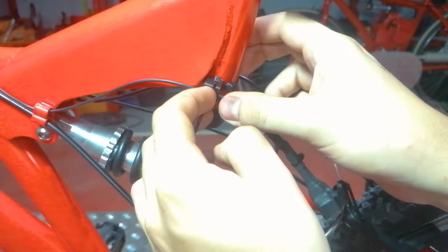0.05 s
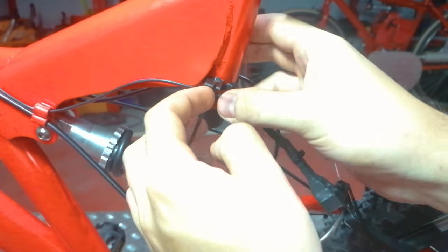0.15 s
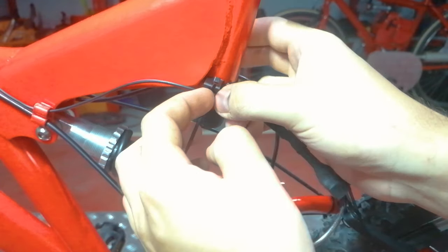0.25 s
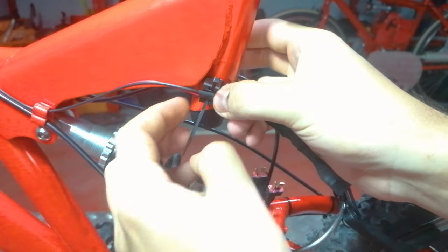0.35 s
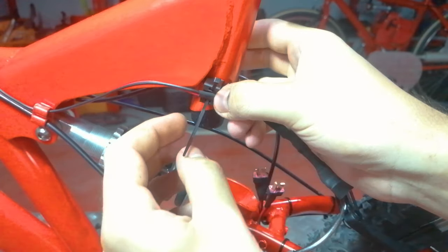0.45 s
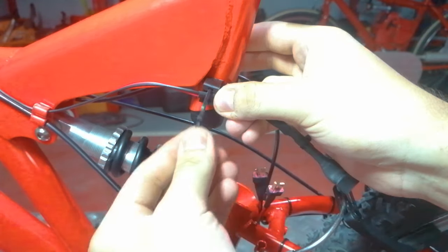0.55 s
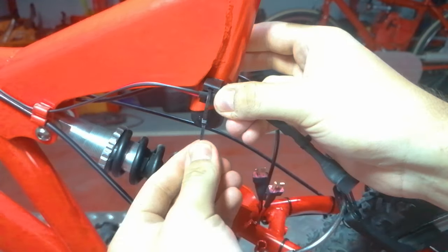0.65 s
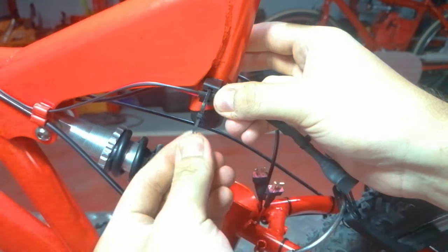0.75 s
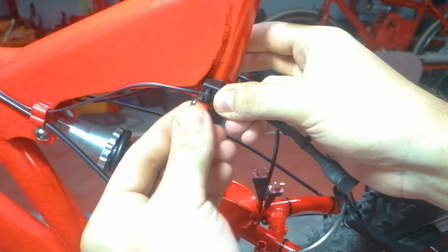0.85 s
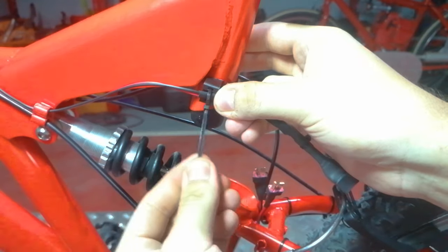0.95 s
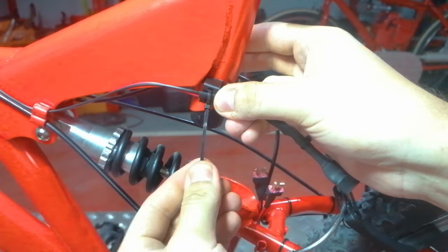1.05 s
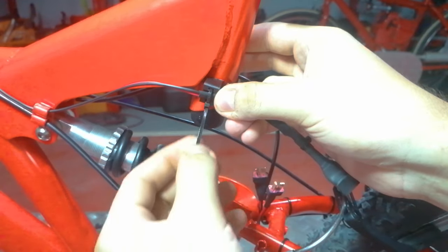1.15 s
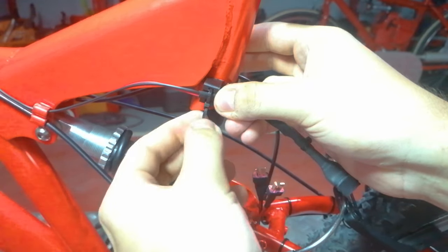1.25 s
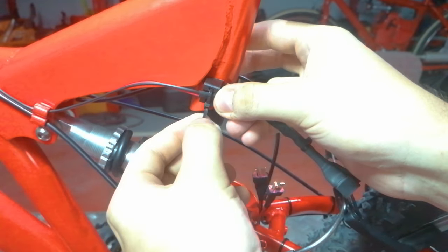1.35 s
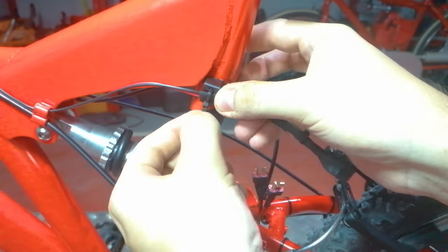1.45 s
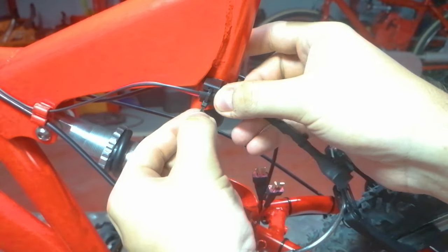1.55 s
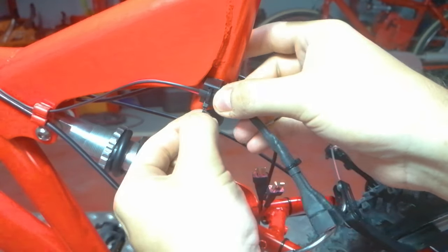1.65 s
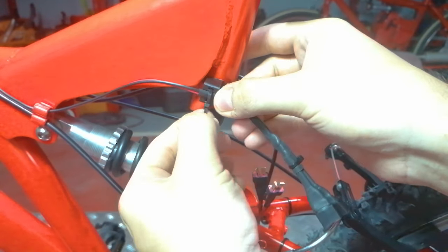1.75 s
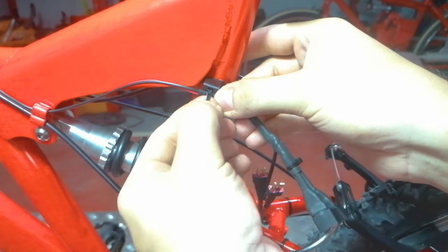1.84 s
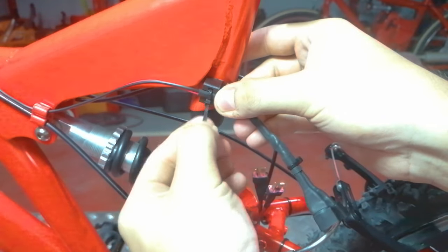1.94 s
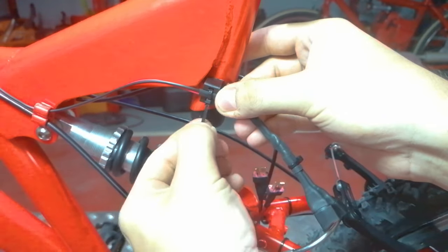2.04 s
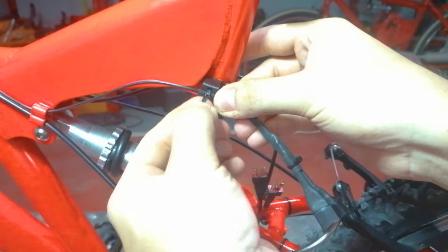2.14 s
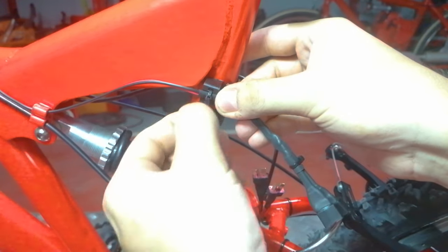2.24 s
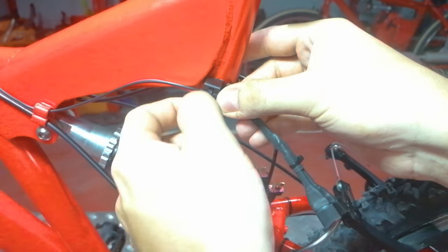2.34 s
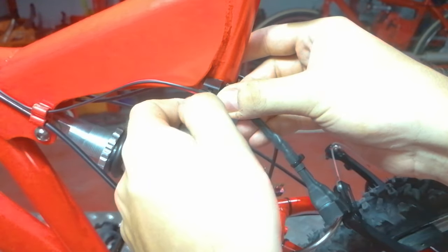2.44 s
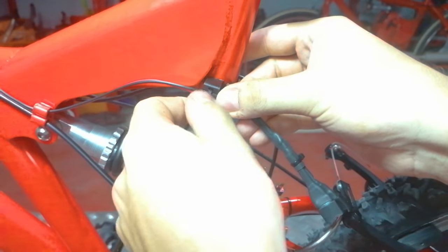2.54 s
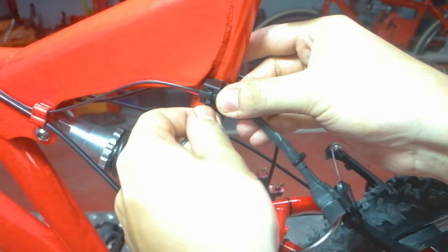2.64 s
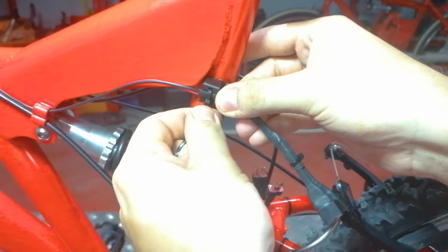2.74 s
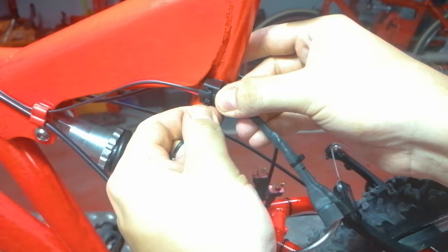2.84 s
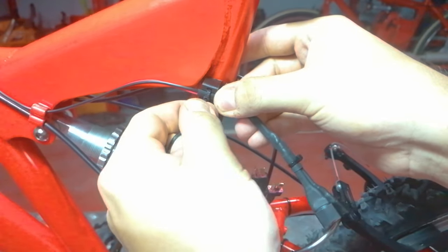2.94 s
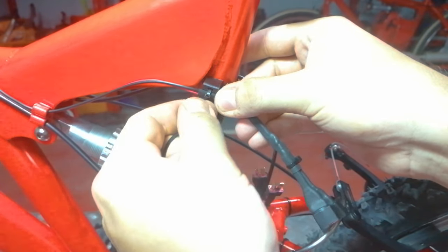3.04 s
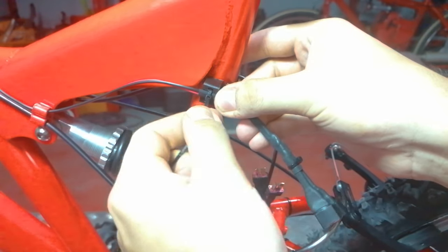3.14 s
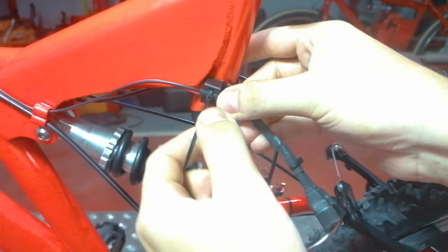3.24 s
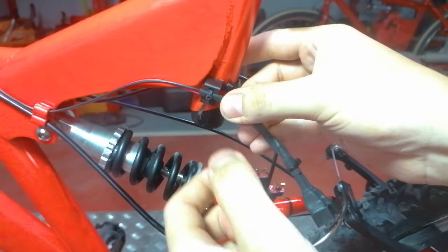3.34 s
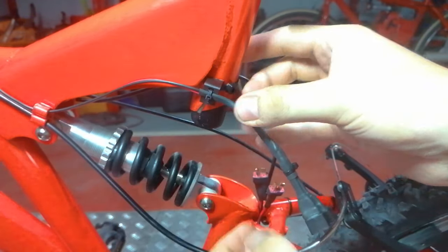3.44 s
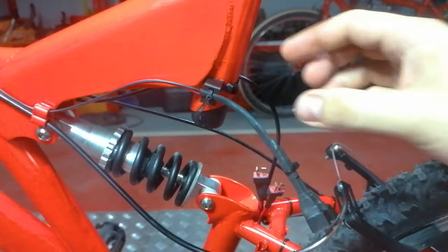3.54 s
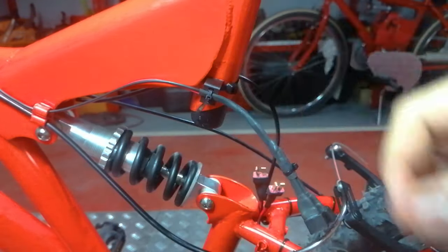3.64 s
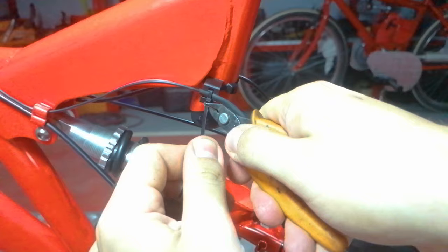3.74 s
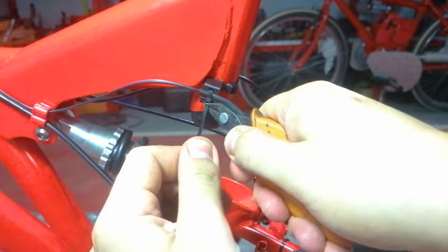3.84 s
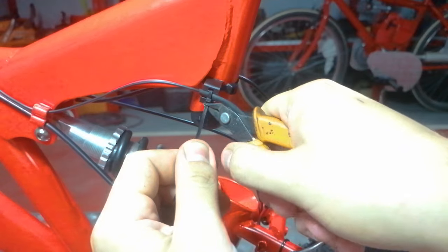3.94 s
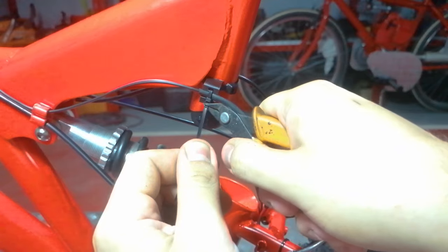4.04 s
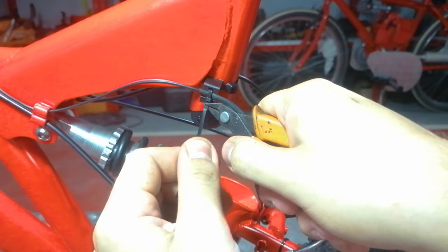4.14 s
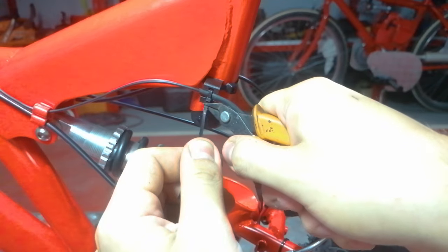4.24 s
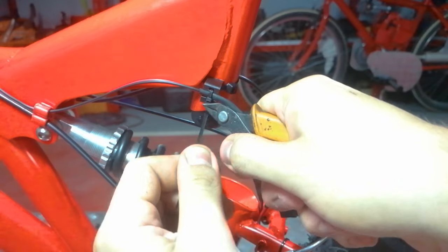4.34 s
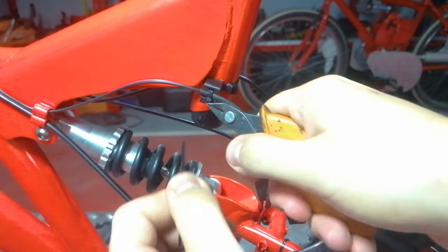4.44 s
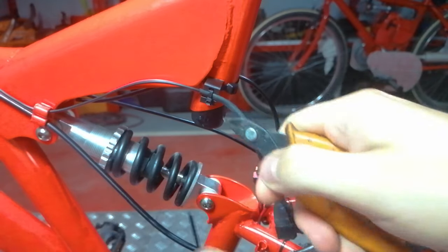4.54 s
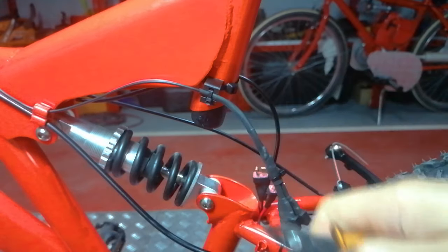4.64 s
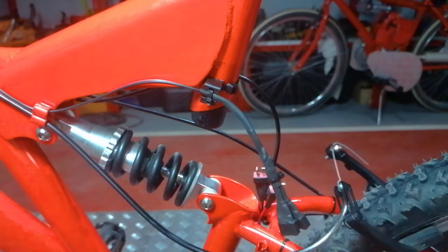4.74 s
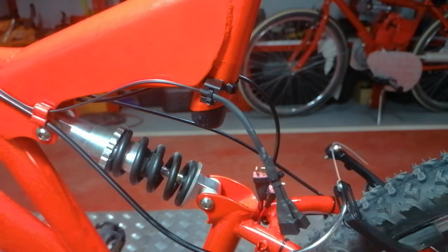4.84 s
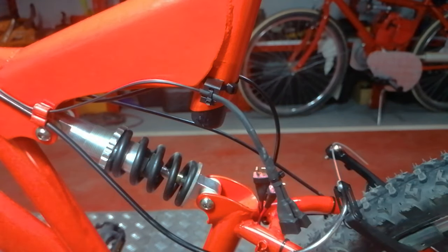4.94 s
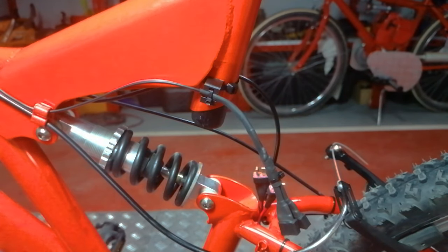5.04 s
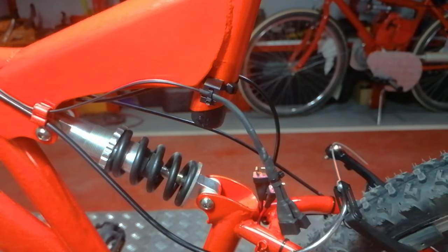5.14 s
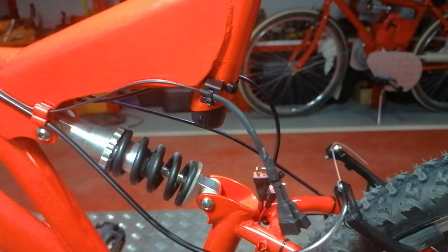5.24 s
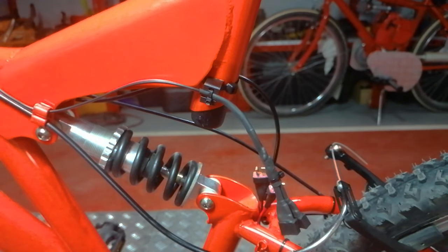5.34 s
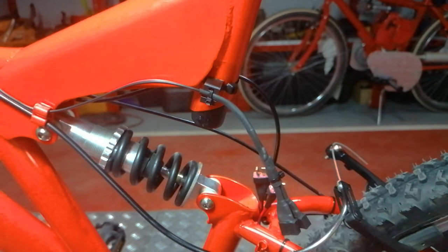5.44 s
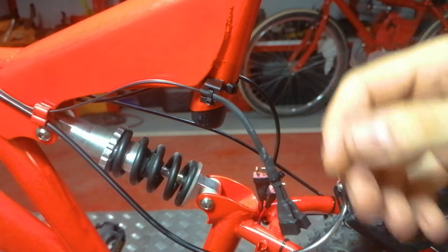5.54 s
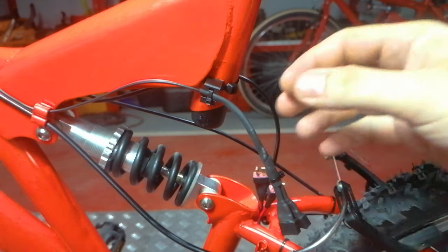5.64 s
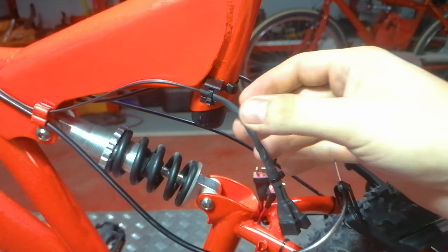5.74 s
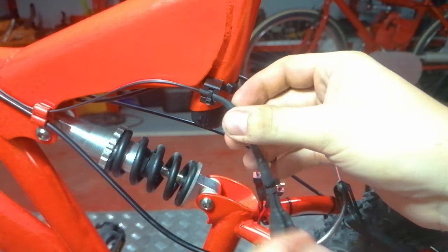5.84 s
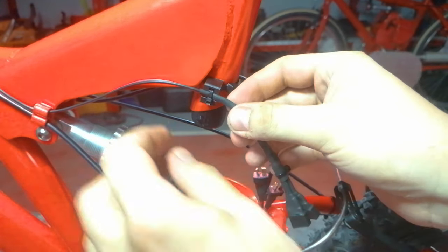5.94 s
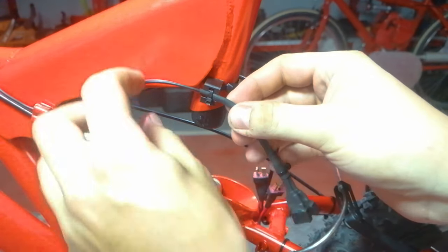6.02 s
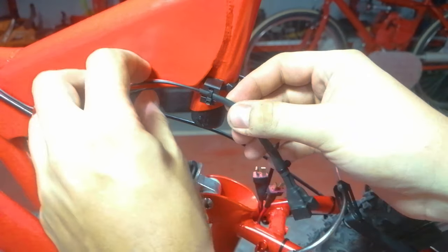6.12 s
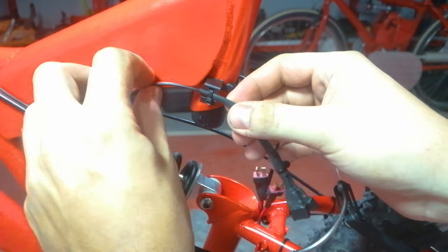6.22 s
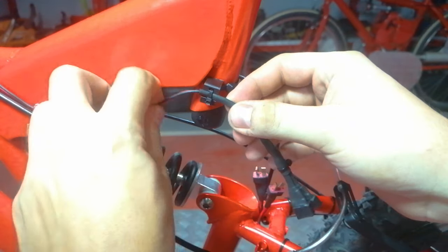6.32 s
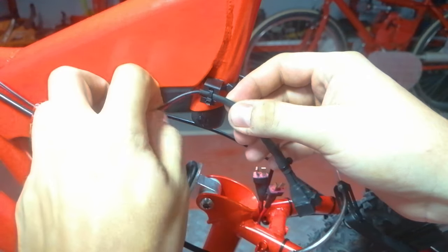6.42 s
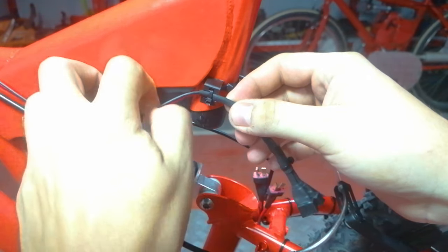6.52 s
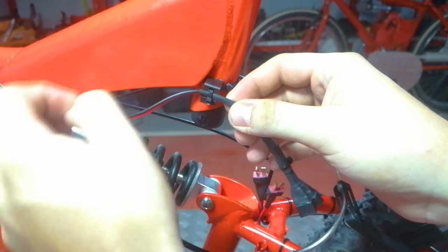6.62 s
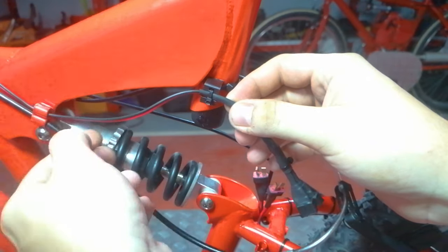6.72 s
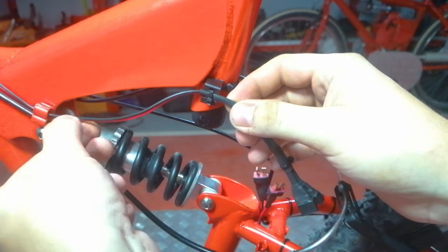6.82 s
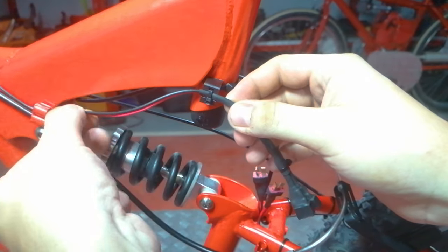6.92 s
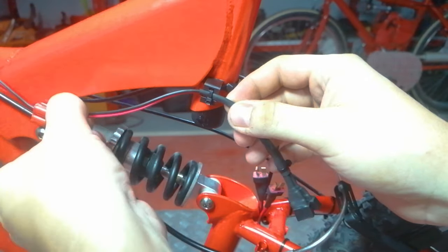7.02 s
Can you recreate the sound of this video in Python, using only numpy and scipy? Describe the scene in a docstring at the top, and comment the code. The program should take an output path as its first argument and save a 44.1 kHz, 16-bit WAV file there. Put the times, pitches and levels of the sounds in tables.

```python
"""Short runs of nylon clicks come first, close to a camera: a zip tie pulled tight round a bicycle frame. Each
click is a struck pawl with a fizz of noise; a taut strap adds its own ring and a rasp. Side cutters then snip
off the tail with a steel ring and a nylon crack, and clatter down on the bench. The place is a quiet workshop
with a dense echo, faint hum whose overtones swell now and then, and rubbing fingers. A noise suppressor lowers
the weak background during loud sounds and briefly after them."""
import sys
import numpy as np
from scipy import signal
from scipy.fft import rfft, irfft, next_fast_len
from scipy.io import wavfile
from scipy.ndimage import uniform_filter1d, minimum_filter1d

SR = 44100
rng = np.random.default_rng(int(sys.argv[2]) if len(sys.argv) > 2 else 0)


def master(y):
    """Save y as 16-bit WAV."""
    cut = np.clip(np.atleast_2d(y).T, -1, 1)
    pcm = np.round(cut * 32767)  # scale
    wavfile.write(sys.argv[1], SR, pcm.astype(np.int16))


N = 312126

# All levels are relative: sounds are rescaled, mixed and given a final gain.

# Colour of room air and microphone hiss. Each row: frequency in Hz, density in dB per Hz.
AIR_COLOUR = [(20, -11), (65, -2), (100, -7.5), (170, -2), (235, -0.5), (350, -1), (500, -3.5), (800, -1),
              (1200, -3), (2300, -3), (4000, -9), (7500, -14.5), (11000, -21), (15000, -17.5)]
AIR_DB = -71
# Steady hum in the room. Each row: frequency in Hz, line width in Hz, level in dB.
HUM_LINES = [(144.7, 5.2, -80), (285, 8, -85), (367, 7.98, -85), (432, 5.5, -82), (811, 24, -88)]
# The hum's second and third harmonics swell, one at a time. Each row: start in seconds, end in seconds, #
# frequency in Hz, level in dB.
HUM_SWELLS = [(1.057, 1.115, 290, -67), (1.505, 1.626, 290, -69), (2.178, 2.823, 431, -74),
              (4.829, 4.88, 290, -68.5), (5.023, 5.28, 290, -76.5)]
SWELL_ATTACK_S, SWELL_RELEASE_S, SWELL_WIDTH_HZ = 0.083, 0.103, 27
# Fingers rub on cable and frame, one row a stroke. Each row: start in seconds, end in seconds, level in dB.
RUB_STROKES = [(1.054, 1.098, -61.5), (1.248, 1.607, -71.5), (2.08, 2.8, -76), (4.831, 5.66, -79.5)]
RUB_ATTACK_S, RUB_RELEASE_S = 0.0915, 0.14
# Colour of skin sliding on cable and paint. Each row: frequency in Hz, level in dB.
RUB_COLOUR = [(60, -14.5), (160, 4.5), (240, -5), (350, -0.5), (600, -8), (850, -4.5), (1300, -9.5),
              (2500, -8), (5000, -19), (14000, -29.5)]
# Very faint wide noise, opposite in phase on the two channels. Each row: frequency in Hz, density in dB per Hz.
SIDE_NOISE = [(30, -2.5), (150, -2), (900, -8.5), (2500, -10.5), (15000, -14.5)]

# Colour of the workshop's echo. Each row: frequency in Hz, level in dB.
ECHO_COLOUR = [(300, -1.5), (1000, -3.5), (1800, 0.5), (3200, 2), (6000, -5.5), (9000, -1.5), (15000, -5)]
# Early decay of that echo. Each row: frequency in Hz, time to fall 60 dB in seconds.
ECHO_T60 = [(300, 0.41), (2000, 0.55), (4000, 0.37), (6300, 0.45), (10000, .38), (15000, .4)]
# Frame and hand, close by, throw each click back. Each row: nominal delay in seconds, level in dB.
NEARBY_BOUNCES = [(.0007, -15), (.0015, -0.5), (.003, -15)]

# The cutters land on the bench, tip over and settle. Each row: time in seconds, thud level in dB,
# steel level in dB, pitch factor of the contact noise.
LANDING_CONTACTS = [(5.2985, -45, -47, 0.96), (5.3293, -37, -23.5, 1.1), (5.349, -39, -31, 1.15),
                    (5.3685, -39, -26.5, 1.05), (5.3771, -38, -29.5, 0.68), (5.4243, -53, -37, 0.93),
                    (5.532, -84, -59.5, .65), (5.612, -96, -66.5, 0.29)]
# Modes of the bench top. Each row: frequency in Hz, level in dB, time to fall 60 dB in seconds.
BENCH_MODES = [(296, -18, 0.075), (371, -21.5, 0.065), (437, -6.5, 0.23), (507, -12.5, 0.18),
               (566, -6, 0.157), (635, -3.5, 0.097), (677.6, 0, 0.097), (731, -4, 0.07), (802, -3, 0.057),
               (878, -5, 0.083), (944, -7, 0.071), (1154, -6, 0.11), (1243, -6, 0.036), (1380, -7, 0.066),
               (1484, -8, 0.045)]
# Dull knock of the handles, at pitch factor 1. Each row: frequency in Hz, level in dB.
KNOCK_COLOUR = [(100, -36), (200, -26), (300, -5), (650, 1), (1300, -5.5), (1900, -17), (3500, -39),
                (8000, -46)]
# Ring of the steel. Each row: frequency in Hz, level in dB, time to fall 60 dB in seconds.
STEEL_MODES = [(3340, -13, .03), (6612, -5, .04), (7170, -4, .04), (7730, -1, .03), (8680, -4, .035),
               (11400, -8, .025)]
# Clack of the steel, at pitch factor 1. Each row: frequency in Hz, level in dB.
CLACK_COLOUR = [(1000, -31), (2400, -12), (3400, -10.5), (4300, -6), (5500, -0.5), (7500, 5), (9500, -2.5),
                (12000, -5.5), (16000, -19.5)]
# Between the blows they rattle, most at the crest: start, crest and end in seconds; contacts per second.
RATTLE_S, RATTLE_PER_S = (5.306, 5.345, 5.455), 110
# Levels of the rattle: dB at the crest, rise in dB per second, fall in dB per second.
RATTLE_THUD, RATTLE_CLACK = (-42, 160, 160), (-41.5, 150, 43)

# The jaws first touch the strap, then bite through.
TOUCH_S, TOUCH_DB = 4.0848, -52
SNIP_S, SNIP_RING_DB, SNIP_CRACK_DB = 4.3713, -13.5, -14.5
# Colour of the touch. Each row: frequency in Hz, level in dB.
TOUCH_COLOUR = [(5000, -36), (11000, -30.0), (13500, 3), (16000, 0)]
# What rings when the tail parts. Each row: frequency in Hz, level in dB, time to fall 60 dB in seconds.
JAW_MODES = [(4750, -18, .009), (5700, -10, 0.022), (6010, -1, 0.013), (6100, -10.5, 0.023),
             (6640, -5.5, 0.0159), (7790, -9.5, .008), (9000, -6, 0.0084), (10600, -12, 0.0043),
             (14270, -15, .007)]
# Crack of snapping nylon. Each row: frequency in Hz, level in dB.
CRACK_COLOUR = [(300, -44.5), (700, -37), (1100, -23.5), (1500, -26.5), (1850, -23.5), (2400, -23),
                (3200, -11), (4500, -6.5), (7000, 0.5), (9800, -1.5), (11200, 1.5), (13000, -4.5),
                (16000, -3)]
# The snip as it spreads into the room. Each row: frequency in Hz, level in dB.
SPRAY_COLOUR = [(300, -34), (750, -35), (1150, -20.5), (1500, -21.5), (1870, -11.5), (2450, -19),
                (3300, -12.5), (4700, -7), (6050, 3), (8200, -2), (9800, -9.5), (11000, -2.5),
                (13000, -7.5), (15000, -8)]

# Ring of the pawl. Each row: multiple of its pitch, level in dB, time to fall 60 dB in seconds.
PAWL_MODES = [(.87, -10.5, 0.0038), (.985, -7, 0.0095), (1.09, -6, 0.0035), (1.25, -8.5, 0.0022),
              (1.48, -21.5, 0.011)]
# Nylon scraping off a tooth. Each row: frequency in Hz, level in dB.
FIZZ_COLOUR = [(1000, -38), (3500, -9), (5500, 1.5), (9000, -4.5), (11300, -6), (13000, 5), (14500, 14),
               (16000, -7)]
# Ring of the strap. Each row: frequency in Hz, level in dB, time to fall 60 dB in seconds.
STRAP_MODES = [(1870, -16, 0.019), (2500, -2.5, 0.013), (3196, 3.5, 0.025), (3640, 2, 0.0099),
               (4150, -14, 0.0065)]
# Rasp of the taut strap. Each row: frequency in Hz, level in dB.
RASP_COLOUR = [(600, -28), (1400, -12), (2300, -6), (3100, -5.5), (4400, -1.5), (5300, 1), (7000, -32.5)]
# One row a pull. Each row: first tooth in seconds, last tooth in seconds, number of teeth,
# stall as extra gaps before the last tooth (negative hurries), crest as the share of the pull where
# force peaks, pawl level in dB at the crest, its rise in dB, first pitch in Hz, last pitch in Hz,
# fizz level in dB at the crest before a common trim, its rise in dB, strap level in dB at the crest,
# rasp level in dB at the crest.
PULLS = [(0.5433, .5715, 3, -.25, 1, -46, 30, 5800, 5780, -53.5, 0, -71, -72),
         (0.659, 0.7184, 7, 3, 0.72, -46.5, 11, 9000, 7280, -50, 7, -80, -82),
         (.894, 0.9338, 18, 0.8, 0.93, -44, 3.5, 6250, 7750, -49.5, 23, -49.5, -59.5),
         (1.017, 1.103, 12, 4, 0.69, -35.5, 19, 6200, 6040, -50.5, 3, -52.5, -59),
         (1.889, 1.9422, 6, .15, .8, -41, 11.5, 6100, 6630, -47.5, 26, -61, -51.5),
         (2.047, 2.058, 3, 0, .47, -39, 6, 6100, 6600, -53, 0, -76, -60)]
# The stall spreads over the last few teeth; the strap only sounds once it is taut.
STALL_TEETH, TAUT_RISE_DB = 1.1, 43
TOOTH_DETUNE = 0.021  # spread of pawl pitch from tooth to tooth, as a share

# The level dips briefly: start and end in seconds, with a ramp on either side.
DIP_S, DIP_DB, DIP_RAMP_S = (6.46, 6.53), -5.5, 0.018
EDGE_HZ = 16100  # upper band limit


def amp(db):
    """Decibels to gain."""
    return 10 ** (np.asarray(db) / 20)


def read(points, hz):
    """A table's value at hz, on a log-frequency axis."""
    f, value = np.transpose(points)
    return np.interp(np.log(hz + 1), np.log(f), value)


def add(mix, s, sound):
    """Mixes a sound in at s seconds."""
    part = mix[round(s * SR):][:len(sound)]
    part += sound[:len(part)]


def evened(x):
    """Scales to rms 1."""
    return x / np.sqrt(np.mean(x ** 2) + 1e-20)


def struck(x, size=176):
    """Scales a hit so that its first 4 ms have rms 1."""
    return x / np.sqrt(np.mean(x[:size] ** 2) + 1e-20)


def thin(x, hz, order=3):
    """A small object radiates little below hz."""
    return signal.sosfilt(signal.butter(order, hz, "highpass", fs=SR, output="sos"), x)


def swell(start, end, attack_s, release_s):
    """An envelope that rises to 1 by start, holds until end and falls back to 0."""
    t = np.arange(N) / SR
    rise = 1 + (t - start) / attack_s
    fall = 1 - (t - end) / release_s
    return np.clip(np.minimum(rise, fall), 0, 1)


def ring(modes, pitch=1, size=12000):
    """A struck thing rings as a sum of sines, each dying at its own rate."""
    hz, db, t60 = np.transpose(modes)[:, :, None]
    t = np.arange(size) / SR
    # neighbouring modes start in roughly opposite phase
    phase = np.pi * (np.arange(len(modes))[:, None] + rng.uniform(-0.16, 0.36, hz.shape))
    decay = np.exp(-np.log(1000) * t / t60)
    sines = np.sin(2 * np.pi * hz * pitch * t + phase)
    return struck((amp(db) * decay * sines).sum(0))


def burst(colour, fade_s, pitch=1, size=12000):
    """A quickly fading puff of noise through a causal filter; pitch shifts its colour."""
    hz = abs(np.fft.fftfreq(size, 1 / SR))
    log_gain = np.log(amp(read(colour, hz / pitch)))
    # minimum phase keeps the onset sharp
    response = np.exp(np.conj(signal.hilbert(log_gain)))[:size // 2 + 1]
    puff = rng.choice([-1, 1], size) * np.exp(-np.arange(size) / SR / fade_s)
    return struck(irfft(rfft(puff) * response, size))


def noise(gain):
    """Steady noise whose spectrum is the function gain(Hz), at rms 1."""
    size = next_fast_len(N)
    spectrum = rfft(rng.standard_normal(size)) * gain(np.fft.rfftfreq(size, 1 / SR))
    return evened(irfft(spectrum, size)[:N])


def tone(hz, width_hz, waver):
    """A sine plus narrow noise around it, so the line wavers in level and phase."""
    fuzz = noise(lambda f: 1 / (1 + (2 * (f - hz) / width_hz) ** 2))
    sine = np.sin(2 * np.pi * (hz * np.arange(N) / SR + rng.random()))
    return evened(sine + waver * fuzz)


def room_air():
    """Room air and microphone hiss: steady coloured noise."""
    return amp(AIR_DB) * noise(lambda f: amp(read(AIR_COLOUR, f)))


def room_hum():
    """Steady hum: a few wavering lines."""
    return sum(amp(db) * tone(hz, width, waver=1.0) for hz, width, db in HUM_LINES)


def hum_swells():
    """A harmonic of the hum swells and fades as a wavering line, one at a time."""
    drone = np.zeros(N)
    for start, end, hz, db in HUM_SWELLS:
        envelope = swell(start, end, SWELL_ATTACK_S, SWELL_RELEASE_S)
        drone += amp(db) * envelope * tone(hz, SWELL_WIDTH_HZ, waver=0.98)
    return drone


def finger_rub():
    """Skin sliding on cable and paint: coloured noise that swells with each stroke."""
    strokes = sum(amp(db) * swell(start, end, RUB_ATTACK_S, RUB_RELEASE_S) for start, end, db in RUB_STROKES)
    return strokes * noise(lambda f: amp(read(RUB_COLOUR, f)))


def background():
    """Air, hum with its swelling harmonics and the rub of fingers."""
    return room_air() + room_hum() + hum_swells() + finger_rub()


def workshop(x, hold_s, late_db_per_s=170, first_s=.002, size=20000):
    """Dense reflections from nearby clutter; after hold_s the tail falls faster."""
    t = np.arange(size) / SR
    taps = rng.standard_normal(size) * np.clip((t - first_s) / first_s, 0, 1)
    hz, when, z = signal.stft(taps, SR, nperseg=128)
    fade = np.exp(-np.log(1000) * when / read(ECHO_T60, hz)[:, None])
    fade *= amp(-late_db_per_s * np.maximum(when - hold_s, 0))
    fade /= np.sqrt(np.mean(fade ** 2, 1, keepdims=True) * size)  # equal energy in every band
    colour = amp(read(ECHO_COLOUR, hz))[:, None]
    tail = signal.istft(z * fade * colour, SR, nperseg=128)[1]
    return signal.fftconvolve(x, tail)[:N]


def rattle(jitter=.4, pitch=1.1, detune=.15):
    """Light contacts at uneven times, growing to a crest and dying away."""
    start, crest, end = RATTLE_S
    beats = np.arange(start, end, 1 / RATTLE_PER_S)
    late, bend = rng.uniform(-1, 1, (len(beats), 2)).T
    s = beats + jitter * late / RATTLE_PER_S

    def level(db, rise, fall):
        """A peak at the crest with straight slopes in dB."""
        return db - np.maximum(rise * (crest - s), fall * (s - crest))

    return list(zip(s, level(*RATTLE_THUD), level(*RATTLE_CLACK), pitch + detune * bend))


def landing(bench_db=-6.5, knock_db=-3, steel_db=-10, clack_db=-2.5):
    """Contacts thump bench and steel, each with its own pitch of knock and clack; the last faint ticks are dullest."""
    wood, steel = np.zeros((2, N))
    for s, thud_db, metal_db, pitch in list(LANDING_CONTACTS) + rattle():
        thump = amp(bench_db) * ring(BENCH_MODES)
        knock = amp(knock_db) * burst(KNOCK_COLOUR, 0.0039, pitch)
        add(wood, s, amp(thud_db) * (thump + knock))
        steel_ring = amp(steel_db) * ring(STEEL_MODES)
        clack = amp(clack_db) * burst(CLACK_COLOUR, 0.0032, pitch)
        add(steel, s, amp(metal_db) * (steel_ring + clack))
    return thin(wood, 207) + thin(steel, 1200)


def snip(crack_fade_s=0.0025, spray_db=-14.5, room_db=-12):
    """The jaws tick against the strap; then the nylon parts, they slam shut and the crack fills the room."""
    near, spray = np.zeros((2, N))
    add(near, TOUCH_S, amp(TOUCH_DB) * burst(TOUCH_COLOUR, 0.0011))
    jaws = amp(SNIP_RING_DB) * thin(ring(JAW_MODES), 3500)
    crack = amp(SNIP_CRACK_DB) * burst(CRACK_COLOUR, crack_fade_s)
    add(near, SNIP_S, jaws + crack)
    # a fade of a tenth of a sample leaves a single filtered impulse
    add(spray, SNIP_S, amp(spray_db) * burst(SPRAY_COLOUR, .1 / SR))
    return near + workshop(spray + amp(room_db) * near, hold_s=.076, late_db_per_s=155)


def scattered(click):
    """A click with its first bounces, whose paths change as the fingers move."""
    out = click.copy()
    for delay_s, db in NEARBY_BOUNCES:
        add(out, delay_s * rng.uniform(0.87, 1.1), amp(db) * click)
    return struck(out)


def pull(first_s, last_s, teeth, stall, crest, pawl_db, pawl_rise_db, first_hz, last_hz,
         fizz_db, fizz_rise_db, strap_db, rasp_db):
    """Teeth pass evenly until the hand stalls or hurries; levels follow one arch of force, pitch glides."""
    count = round(teeth)
    gaps = 1 + stall * np.exp(-np.arange(count - 1)[::-1] / STALL_TEETH)
    times = first_s + (last_s - first_s) * np.append(0, np.cumsum(gaps)) / gaps.sum()
    progress = np.linspace(0, 1, count)
    slack = (1 - progress / crest) ** 2  # 1 at the first tooth, 0 at the crest
    detune = TOOTH_DETUNE * rng.standard_normal(count)
    hz = (first_hz + (last_hz - first_hz) * progress) * (1 + detune)
    return zip(times, hz, pawl_db - pawl_rise_db * slack, fizz_db - fizz_rise_db * slack,
               strap_db - TAUT_RISE_DB * slack, rasp_db - TAUT_RISE_DB * slack)


def ratchet(fizz_fade_s=0.002, fizz_trim_db=2, edge_db=-10, rasp_fade_s=.014):
    """Each tooth lets the pawl snap back: it rings, fizzes and shakes the strap, which rasps under tension."""
    pawl, strap, rasp = np.zeros((3, N))
    for row in PULLS:
        for s, hz, pawl_db, fizz_db, strap_db, rasp_db in pull(*row):
            add(pawl, s, amp(pawl_db) * scattered(ring(PAWL_MODES, hz)))
            add(pawl, s, amp(fizz_db + fizz_trim_db) * scattered(burst(FIZZ_COLOUR, fizz_fade_s)))
            add(pawl, s, amp(pawl_db + edge_db) * burst(CRACK_COLOUR, 0.0026))  # sharp edge of a hard snap
            add(strap, s, amp(strap_db) * ring(STRAP_MODES))
            add(rasp, s, amp(rasp_db) * burst(RASP_COLOUR, rasp_fade_s))
    return thin(pawl, 4980, order=9) + thin(strap, 1900) + rasp


def scene(tie_room_db=-4.5, bench_room_db=0, mismatch_db=-39, side_noise_db=-94):
    """All sources in the room, heard on two nearly identical channels."""
    tie, bench = ratchet(), landing()
    tie_room = amp(tie_room_db) * workshop(tie, hold_s=0.0022, late_db_per_s=215)
    bench_room = amp(bench_room_db) * workshop(bench, hold_s=0.026)
    mid = tie + snip() + bench + tie_room + bench_room + background()
    # a faint late copy and very faint wide noise, opposite in phase on the two channels
    side_noise = amp(side_noise_db) * noise(lambda f: amp(read(SIDE_NOISE, f)))
    side = amp(mismatch_db) * np.roll(mid, 9) + side_noise
    return np.array([mid + side, mid - side])


def suppress(x, depth_db=6, wake_db=-55, span_db=12, margin_db=14, size=512):
    """While the sound is loud, and briefly after, bins near the noise floor are turned down."""
    z = signal.stft(x, SR, nperseg=size)[2]
    power = (abs(z) ** 2).mean(0)
    held = signal.lfilter([.3], [1, -.7], power.sum(0))
    # 0 at span_db below wake_db, 1 from wake_db up
    busy = np.clip((10 * np.log10(held + 1e-14) - wake_db) / span_db + 1, 0, 1)
    smooth = uniform_filter1d(uniform_filter1d(power, 3, 0), 3, 1)
    level_db = 10 * np.log10(abs(smooth) + 1e-16)
    # each bin's median over time stands for its noise floor
    over_db = level_db - np.median(level_db, 1, keepdims=True)
    weak = np.clip(2.5 - 2 * over_db / margin_db, 0, 1)
    return signal.istft(z * amp(-depth_db * busy * weak), SR, nperseg=size)[1][:, :N]


def limit(x, ceiling=.82, size=89):
    """A fast limiter turns the gain down smoothly round any peak over the ceiling."""
    gain = ceiling / np.maximum(abs(x).max(0), ceiling)
    return x * uniform_filter1d(minimum_filter1d(gain, size), size)


def record(dry, gain_db=1):
    """Noise suppression, one brief dip in level, the limiter and the band limit."""
    dip_db = DIP_DB * swell(*DIP_S, DIP_RAMP_S, DIP_RAMP_S)
    out = limit(suppress(dry) * amp(gain_db + dip_db))
    low_pass = signal.firwin(255, EDGE_HZ, window=("kaiser", 8), fs=SR)
    return signal.oaconvolve(out, low_pass[None], "same", axes=1)


dry = scene()
out = record(dry)
master(out)
```